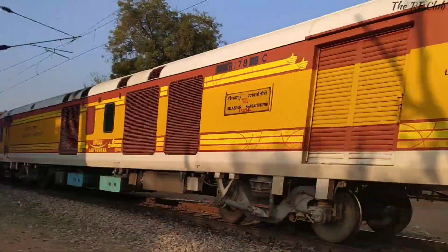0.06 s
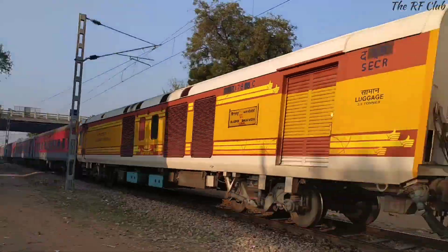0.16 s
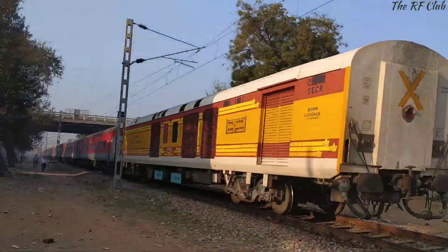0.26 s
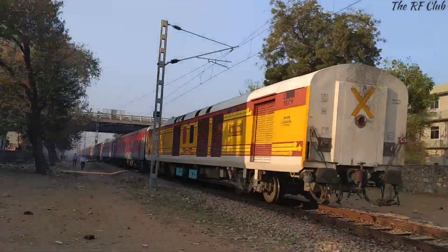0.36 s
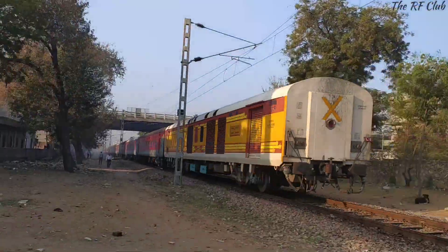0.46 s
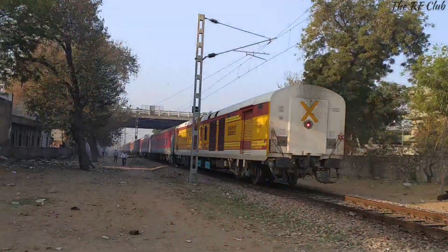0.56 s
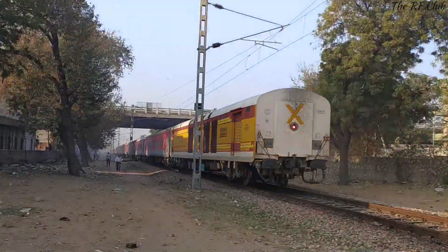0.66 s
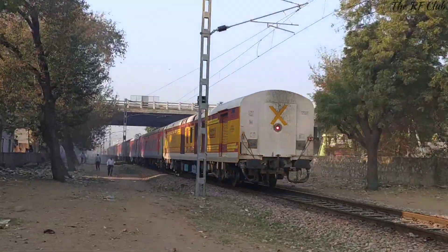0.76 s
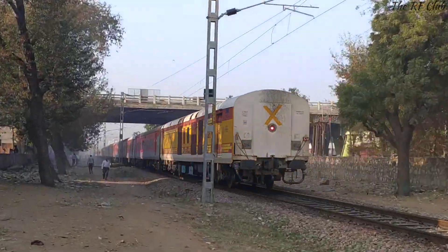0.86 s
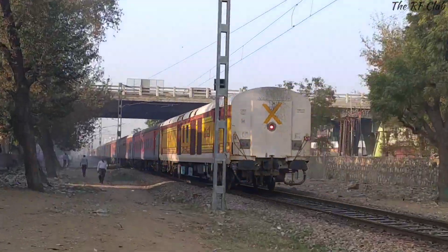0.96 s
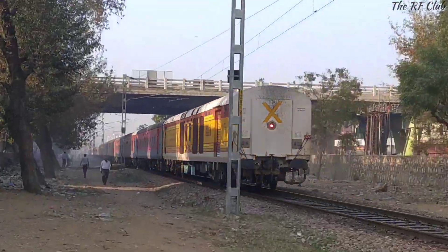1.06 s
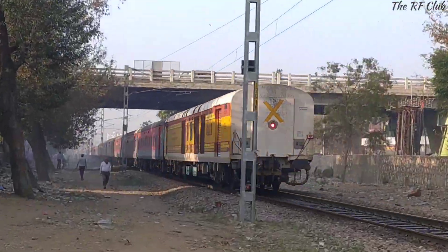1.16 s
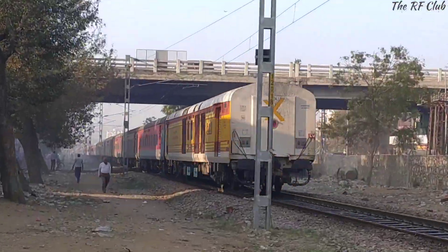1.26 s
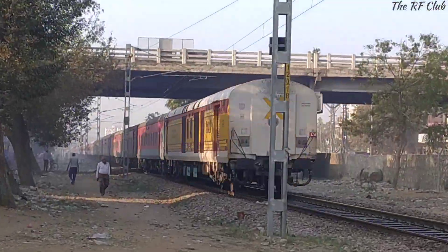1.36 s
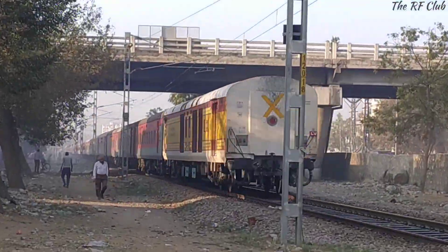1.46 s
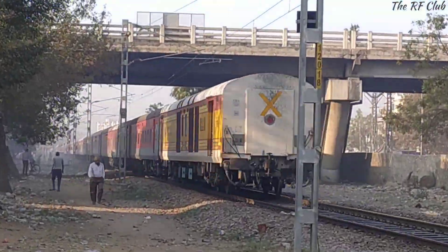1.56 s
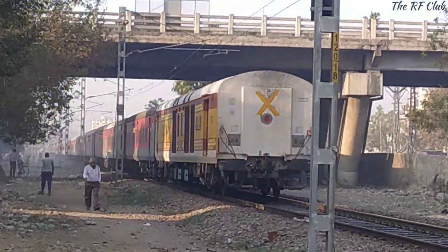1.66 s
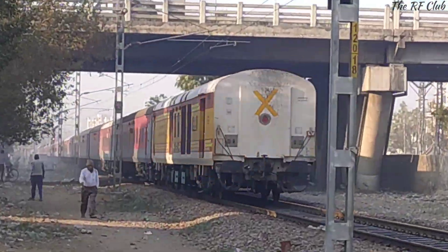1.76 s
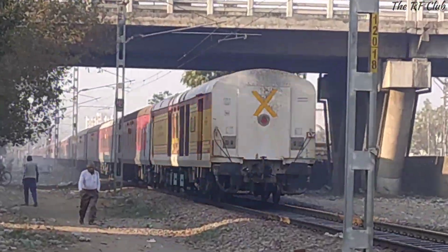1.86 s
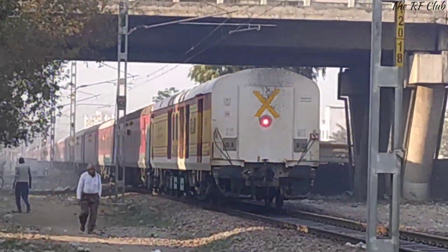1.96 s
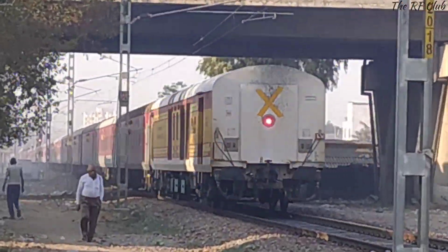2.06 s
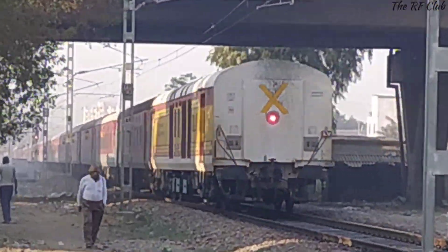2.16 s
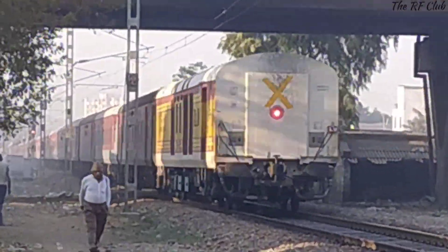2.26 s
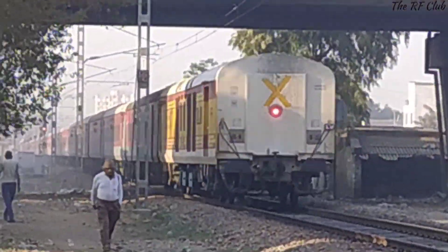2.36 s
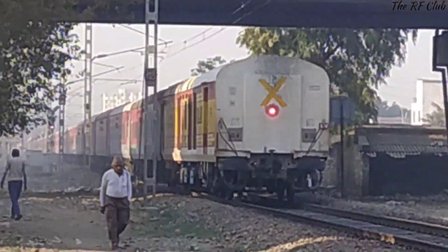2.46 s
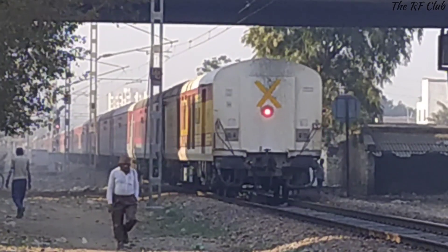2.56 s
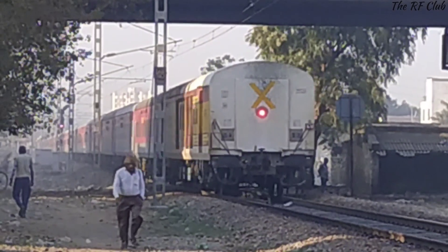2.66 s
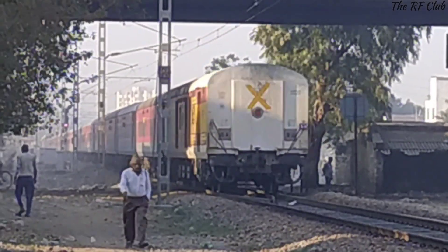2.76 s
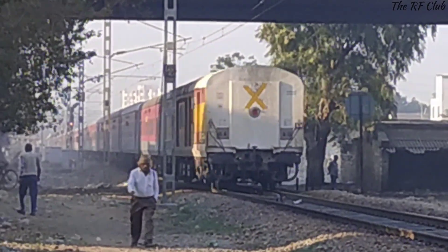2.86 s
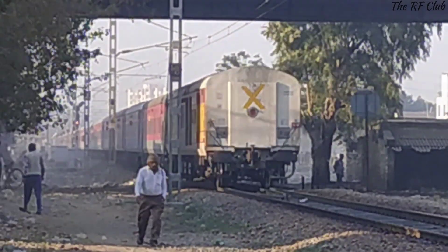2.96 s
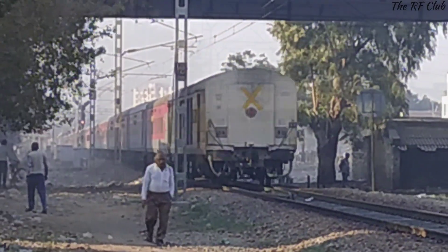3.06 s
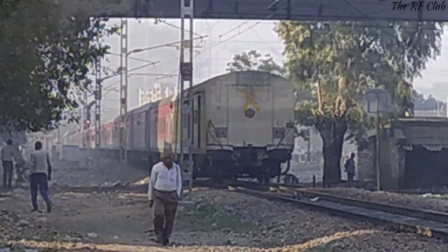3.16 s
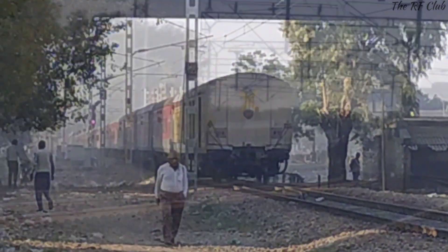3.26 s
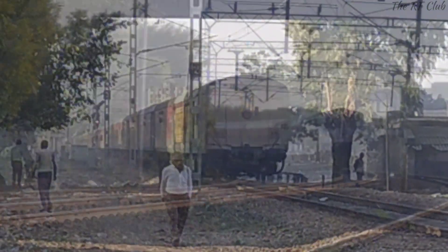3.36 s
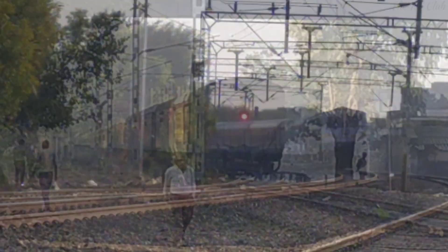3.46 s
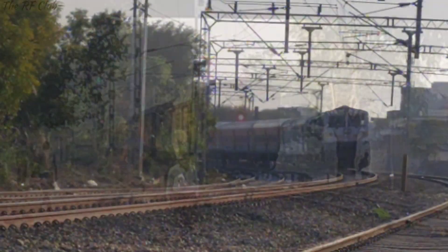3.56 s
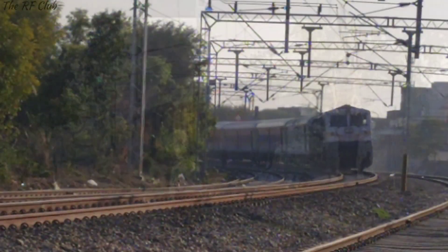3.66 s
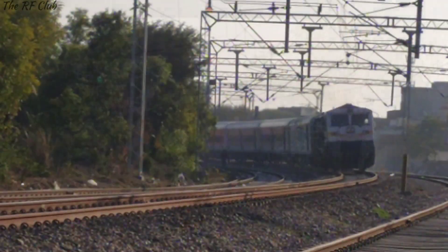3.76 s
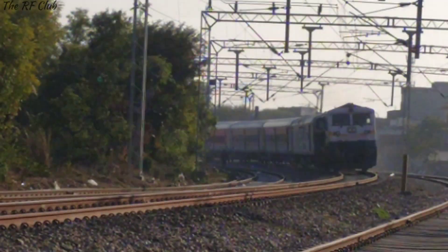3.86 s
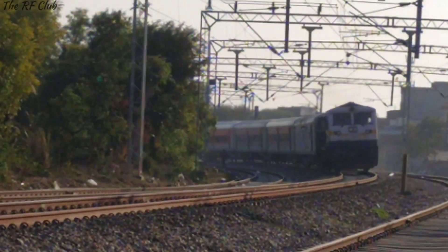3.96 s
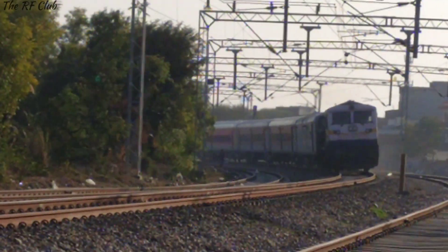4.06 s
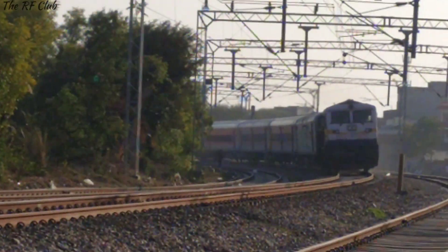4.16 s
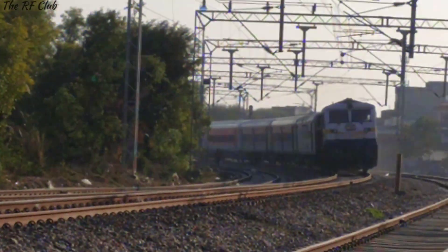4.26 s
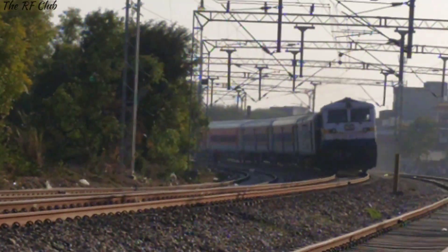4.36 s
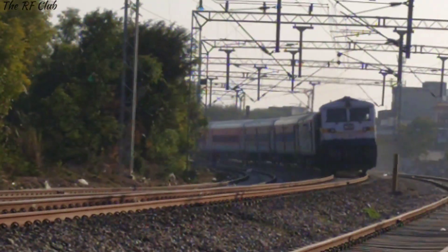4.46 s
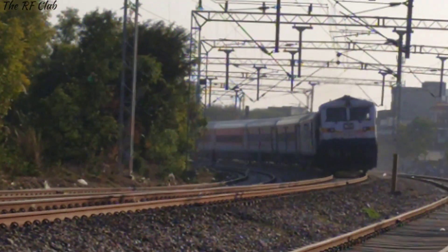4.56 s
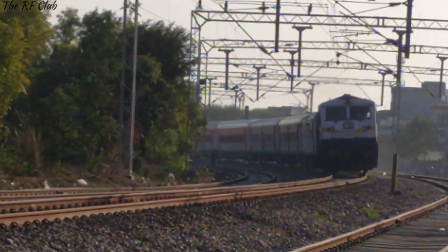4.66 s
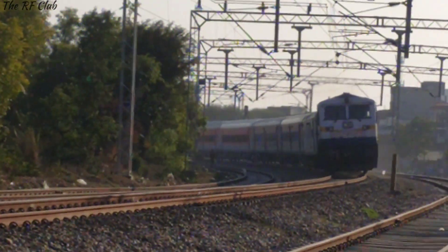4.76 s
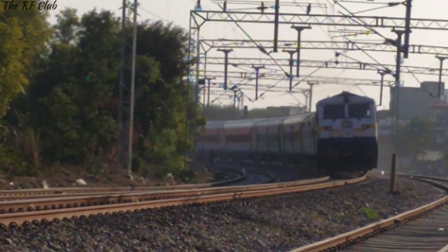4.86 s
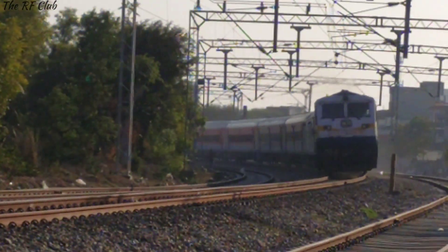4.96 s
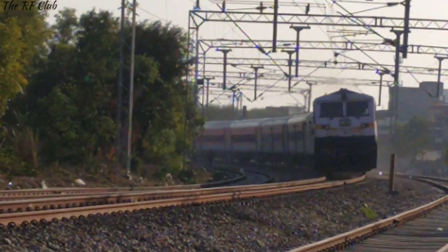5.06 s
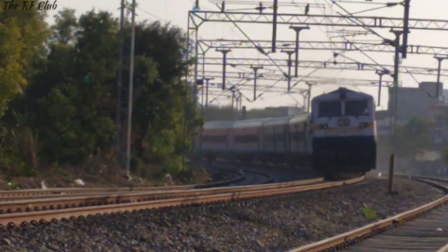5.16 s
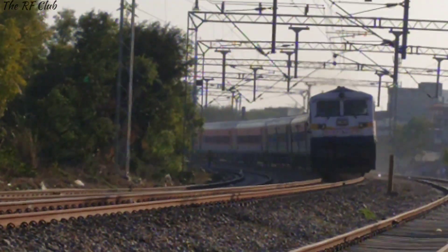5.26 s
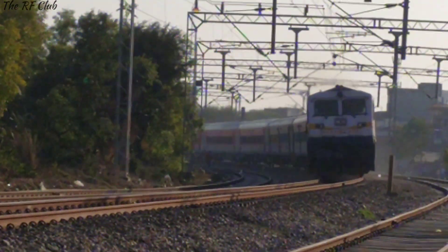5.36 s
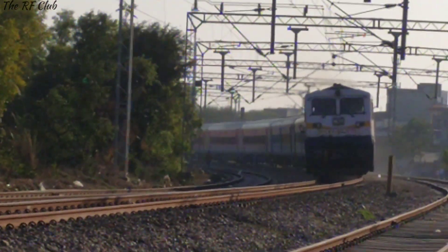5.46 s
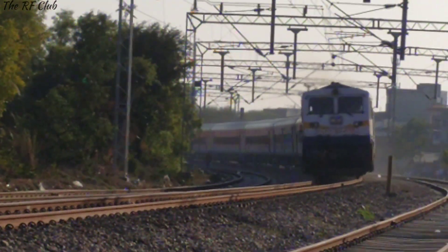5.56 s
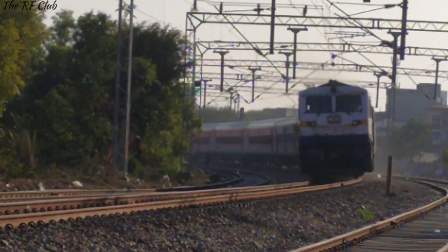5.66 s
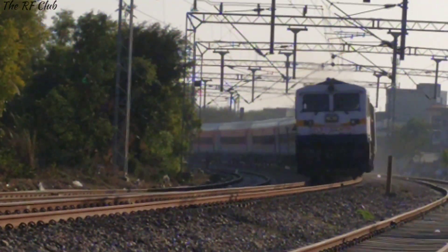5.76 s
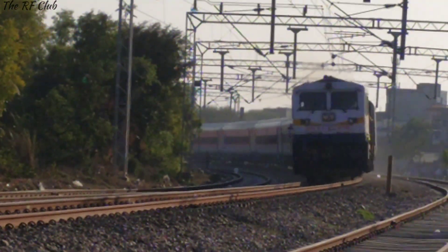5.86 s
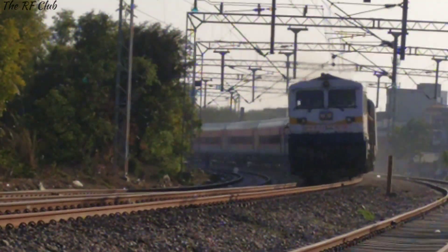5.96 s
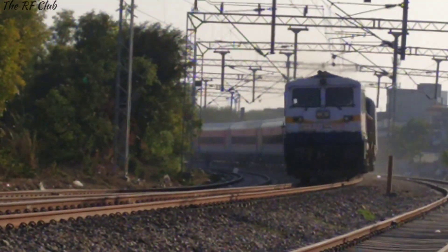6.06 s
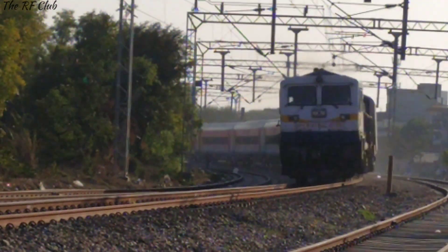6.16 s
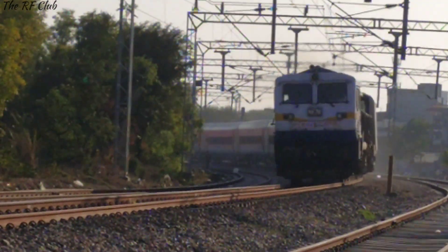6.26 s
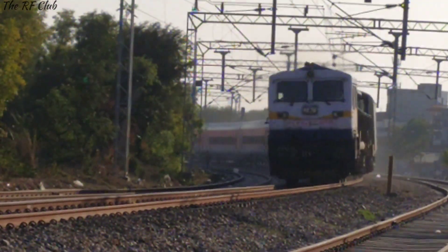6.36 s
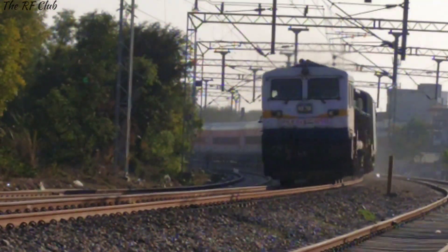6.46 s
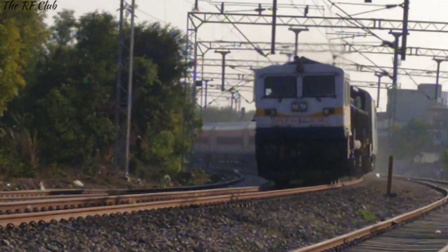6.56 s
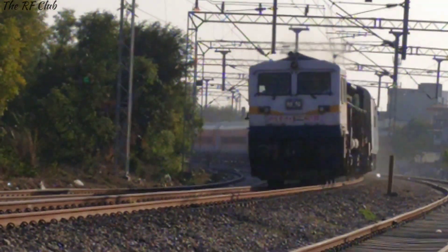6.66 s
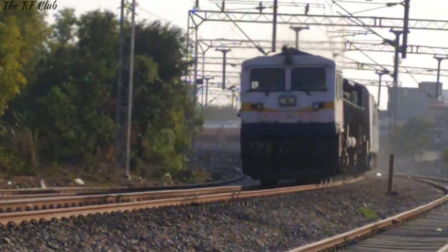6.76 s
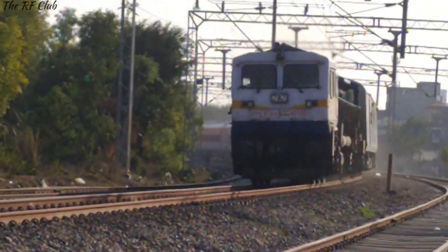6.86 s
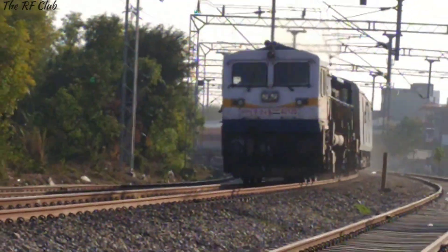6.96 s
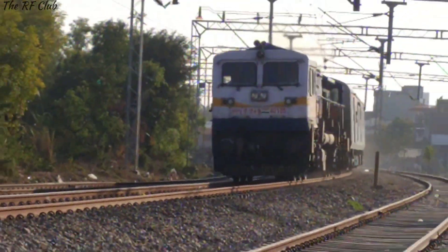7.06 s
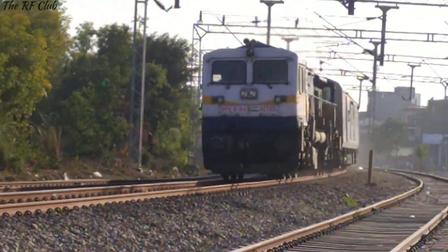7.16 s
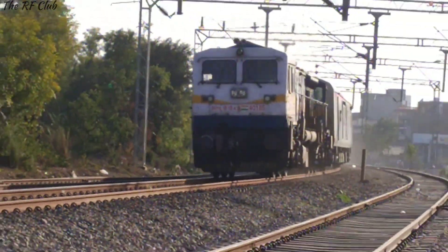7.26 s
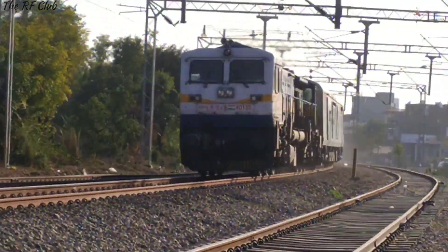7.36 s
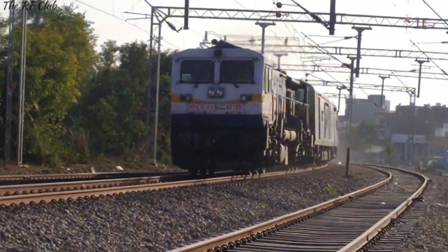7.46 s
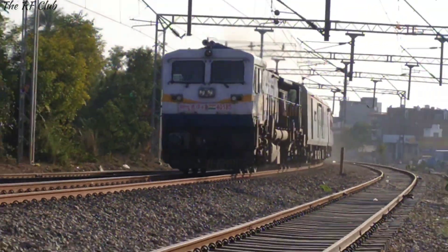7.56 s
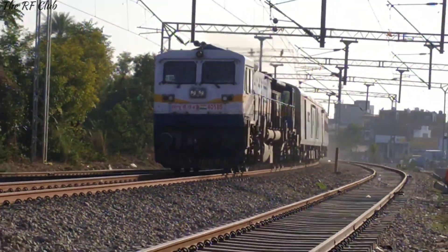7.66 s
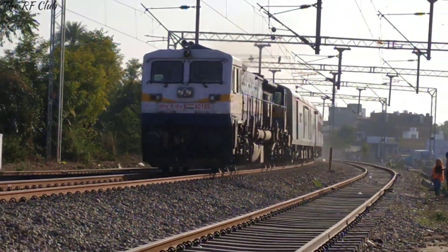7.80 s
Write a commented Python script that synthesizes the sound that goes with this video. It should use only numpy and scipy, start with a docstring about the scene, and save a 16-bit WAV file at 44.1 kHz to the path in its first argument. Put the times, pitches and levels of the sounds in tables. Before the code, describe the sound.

Train coaches clatter past over rail joints with brief squeals and fade away, then a quiet diesel drone grows until a loud brassy horn blares.

```python
"""Close to the track, the last coaches of a passenger train roll past over rail joints, with clatter, clacks
and short squeals, and fade down the line. The scene dissolves to a diesel locomotive coming round a curve:
the engine drones on multiples of the crank rate, filtered noise makes the rails sizzle, far knocks chirp.
Then one air horn, a sum of wavering partials, opens and holds a loud, brassy note; patchy high band noise is
added while it sounds. The left microphone is much duller than the right."""
import sys
import numpy as np
from scipy import signal
from scipy.fft import rfft, irfft, next_fast_len
from scipy.io import wavfile

SR = 44100
rng = np.random.default_rng(int(sys.argv[2]) if len(sys.argv) > 2 else 0)


def unload_wav(signal):
    """Save mono or channel-first audio to the path in sys.argv[1] as 16-bit WAV at rate SR, clipped to [-1, 1]."""
    wavfile.write(
        sys.argv[1],
        SR,
        np.round(np.clip(np.atleast_2d(signal).T, -1, 1) * 32767).astype(np.int16),
    )


N = 345303
TIME = np.arange(N) / SR
BINS = np.maximum(np.fft.rfftfreq(next_fast_len(N, True), 1 / SR), 1)  # Hz

# the last bogie is abreast at ABREAST_S, then runs away along a track TRACK_M from the microphones
ABREAST_S, SPEED_M_PER_S, TRACK_M = 0.12, 21.2, 4.64
# air valve of the horn: (time [s], share of full pressure [0..1])
VALVE = [(6.184, 0), (6.195, .18), (6.206, .36), (6.21, .78), (6.217, .84), (6.226, 1)]


def from_db(db):
    """Decibels to gain."""
    return np.exp(np.asarray(db) * (np.log(10) / 20))


def rms_one(x):
    """Scale to unit rms."""
    return x / np.sqrt(np.mean(x ** 2) + 1e-20)


def in_time(rows):
    """Each column of a curve, sample by sample."""
    s, *columns = np.transpose(rows)
    return [np.interp(TIME, s, c) for c in columns]


def at_hz(points, hz):
    """Read a spectrum on a log-frequency axis."""
    f, value = np.transpose(points)
    return np.interp(np.log(hz), np.log(f), value)


def ramp(start_s, end_s, before, after):
    """Hold, move evenly to a new value, hold."""
    return np.interp(TIME, [start_s, end_s], [before, after])


def bump(x, centre, half_width):
    """A smooth bell shape around one value, top 1."""
    return np.exp(-((x - centre) / half_width) ** 2)


def bell(s, half_s):
    """A smooth rise and fall around one moment, top 1."""
    return bump(TIME, s, half_s)


def swells(events):
    """Sum of bell-shaped swells, as a gain."""
    return sum(from_db(db) * bell(s, half_s) for s, half_s, db in events)


def panned(left_db):
    """Gains of the two ears for a level difference (left minus right), at constant power."""
    gains = from_db(np.array([[.5], [-.5]]) * left_db)
    return gains / np.sqrt(np.mean(gains ** 2, axis=0))


def drift(rate_hz, size=N):
    """Slow chance with spread 1, computed at every 40th sample and joined by straight lines."""
    step = 40
    r = np.exp(-2 * np.pi * step * rate_hz / SR)
    chance = rng.standard_normal(size // step + 2002)
    slow = signal.lfilter([1], [1, -2 * r, r * r], chance)[2000:]  # drop the settling of the filter
    return np.interp(np.arange(size) / step, np.arange(len(slow)), rms_one(slow))


def white():
    """Spectra of two unrelated white noises."""
    return rng.standard_normal((2, len(BINS))) + 1j * rng.standard_normal((2, len(BINS)))


def noise(colour):
    """Coloured noise, unrelated in the two ears; rms 1."""
    return rms_one(irfft(white() * from_db(at_hz(colour, BINS)))[:, :N])


def noise_zones(left, right, likeness, left_db, left_lag_s, edges_hz):
    """Stereo noise with a colour for each ear, cut into zones whose centre signal has rms 1."""
    mid, side = white()
    alike = np.clip(at_hz(likeness, BINS), -1, 1)
    both = np.sqrt(1 + alike) * mid + np.sqrt(1 - alike) * side * [[1], [-1]]
    both = both * from_db([at_hz(left, BINS) + left_db, at_hz(right, BINS)])
    both[0] *= np.exp(-2j * np.pi * BINS * left_lag_s)
    zone = np.searchsorted(edges_hz, BINS)
    parts = [irfft(both * (zone == k))[:, :N] for k in range(len(edges_hz) + 1)]
    return [p / np.sqrt(np.mean(p.mean(axis=0) ** 2)) for p in parts]


def ring(push, hz, t60):
    """Damped resonance: a unit click sets a sine of height 1 ringing, down 60 dB after t60 seconds."""
    r, w = from_db(-60 / (t60 * SR)), 2 * np.pi * hz / SR
    return signal.lfilter([0, np.sin(w)], [1, -2 * r * np.cos(w), r * r], push + 1e-18)


def rubbed(hz, width_hz):
    """Noise keeps a resonance of the given width ringing, apart in the two ears; rms 1."""
    return rms_one(ring(rng.standard_normal((2, N)), hz, np.log(1000) / (np.pi * width_hz)))


def struck(events, modes, scatter_db, spread_s):
    """Each blow reaches every mode with its own strength and a delay of up to spread_s."""
    s, peak_db = np.transpose(events)
    out = np.zeros(N)
    for hz, level_db, t60 in modes:
        clicks = np.zeros(N)
        at = ((s + spread_s * rng.random(len(s))) * SR).astype(int)
        clicks[at] = from_db(peak_db + level_db + scatter_db * rng.standard_normal(len(s)))
        out += ring(clicks, hz, t60)
    return out


def delayed(x, delay_s):
    """Both ears read through a changing delay, which bends the pitch."""
    return np.array([np.interp(TIME - delay_s, TIME, ear) for ear in x])


def track_distances():
    """Distance of the last bogie, in multiples of the distance to the track."""
    return np.hypot(1, SPEED_M_PER_S * np.maximum(TIME - ABREAST_S, 0) / TRACK_M)


def rolling_coaches(distance):
    """Rough wheels shake the bodies and roar on the rails; each layer loses its own dB per doubled distance."""
    # colour in each ear: (frequency [Hz], level [dB per Hz])
    left_colour = [(18, -37), (30, -4), (128, -2.5), (202, 5), (473, -12), (623, -6.5), (954, -5),
                   (1170, -17.5), (1700, -6.5), (1880, -32), (3020, -8.5), (5660, -37), (7450, -86),
                   (8030, -62), (12000, -55), (15600, -79), (22000, -120)]
    right_colour = [(18, -38), (30, -4), (128, -5), (188, -1), (572, -14), (935, -9.5), (1280, -13.5),
                    (1650, -10), (1880, -9.5), (2140, -9.5), (2500, -4.5), (3240, -17), (4890, -29.5),
                    (6340, -19), (8210, -17), (9590, -21), (10600, -36), (14500, -46)]
    # likeness of the two ears: (frequency [Hz], likeness [-1..1])
    likeness = [(60, 0.33), (180, 0.59), (550, 0.65), (1650, 0.43), (4970, 0.097), (15000, 0.01)]
    # bursts of clatter from the running gear: (time [s], half length [s], level [dB])
    clatter_bursts = [(0.06, 0.026, -23), (0.22, 0.01, -19.5), (0.305, 0.02, -30), (0.395, 0.017, -26),
                      (0.81, 0.21, -31), (1.04, 0.053, -32), (2.86, 0.038, -41)]
    # (level abreast dB, loss per doubling of distance dB) of rumble, roar, rail ring and wheel hiss
    layers = (-20.5, 2.1), (-20.5, 3.11), (-20.5, 3.42), (-28, 4.88)
    doublings = np.log2(distance)
    rumble_db, roar_db, ring_db, hiss_db = [db - loss_db * doublings for db, loss_db in layers]
    rumble, roar, rails, hiss = noise_zones(left_colour, right_colour, likeness, left_db=1.0,
                                            left_lag_s=.00007, edges_hz=[400, 1600, 5500])
    judder = drift(34)  # loose gear shakes all layers together
    clatter = swells(clatter_bursts)
    ring_gain = from_db(ring_db + 0.42 * judder + 0.5 * drift(27))
    out = rumble * from_db(rumble_db + drift(3.5) + 0.87 * judder)
    out += roar * np.hypot(from_db(roar_db + 0.89 * judder), clatter)
    out += rails * np.hypot(ring_gain, from_db(0.5) * clatter)
    out += hiss * from_db(hiss_db + 0.26 * judder + drift(30))
    return out


def ringing_wheels(distance):
    """Wheel modes kept ringing by noise; swaying bends them slightly in pitch, and they carry farther."""
    # (frequency [Hz], width [Hz], relative level [dB])
    wheel_modes = [(918, 69, -10.5), (2140, 42, -5.5), (2387, 99, -9), (2676, 68, -18)]
    abreast_db, loss_db, wander_s = -20, 1.9, 0.000501  # loss per doubling of distance
    out = np.zeros((2, N))
    for hz, width_hz, mode_db in wheel_modes:
        swaying = delayed(rubbed(hz, width_hz), wander_s * drift(3.02))
        level_db = abreast_db - loss_db * np.log2(distance) + mode_db + 1.5 * drift(3)
        out += swaying * panned(-2.5) * from_db(level_db)
    return out


def joint_knocks():
    """Wheels strike the rail joints and set the modes of the bogie ringing."""
    # wheels on rail joints: (time [s], relative peak level [dB])
    joints = [(0.052, -4), (0.222, -11), (0.289, -4), (0.356, -17), (0.405, -7), (0.48, -8), (0.55, -4),
              (0.658, -6.5), (0.705, -5.5), (0.813, -6), (0.905, -5), (0.977, -16), (1.03, -3), (1.118, -9),
              (1.232, -7.5), (1.325, -5.5), (1.419, -10), (1.504, -7), (1.647, -7), (1.689, -16),
              (1.77, -9), (1.87, -14), (1.9, -11), (1.975, -13), (2.03, -15), (2.095, -7.5), (2.215, -14),
              (2.25, -13), (2.335, -10), (2.44, -14), (2.83, -12), (2.97, -10.5), (3.04, -13),
              (3.42, -12.5)]
    # what a bogie rings with: (frequency [Hz], relative level [dB], t60 [s])
    bogie_modes = [(103.3, -11, 0.28), (161.8, -7, 0.27), (198, -3.5, 0.28), (243.6, -0.5, 0.099),
                   (351, -3, 0.1), (610, -12, 0.1), (850, -26, .12), (1730, -30, 0.081), (2346, -9.5, 0.15)]
    knocks = from_db(-11.0) * struck(joints, bogie_modes, scatter_db=1.5, spread_s=0.00519)
    return signal.sosfilt(signal.butter(2, 55, "high", fs=SR, output="sos"), knocks)


def gear_clacks():
    """Loose gear clacks against the frame, which answers with short damped modes."""
    # (time [s], relative peak level [dB])
    clacks = [(0.041, -17), (0.259, -13.5), (0.378, -15.5), (0.523, -15.5), (0.753, -15), (0.838, -20),
              (1.077, -15)]
    # what it rings with: (frequency [Hz], relative level [dB], t60 [s])
    clack_modes = [(525, -4, 0.059), (690, -2, 0.043), (850, -4, .06), (957, -4, 0.09), (1570, -12, 0.036),
                   (2130, -5, 0.065), (2465, 0.5, 0.059)]
    return from_db(-2.5) * struck(clacks, clack_modes, scatter_db=4.0, spread_s=0.00402)


def wheel_scrape():
    """A short bright scrape of the nearest wheel: a swell of coloured noise, almost all on the right."""
    # (frequency [Hz], level [dB per Hz])
    scrape_colour = [(2000, -11), (4000, 1), (8000, 13), (12000, -4), (15000, -7)]
    return noise(scrape_colour) * panned(-22.0) * swells([(0.07, 0.04, -20.5)])  # s, half length s, dB


def low_surges():
    """Heavy low surges of the rumble: swells of dark noise, stronger on the right."""
    # (frequency [Hz], level [dB per Hz])
    surge_colour = [(50, -23), (110, -8), (200, -4), (360, -10), (600, -14), (1500, -68)]
    # (time [s], half length [s], level [dB])
    surges = [(0.93, .03, -23), (1.43, 0.052, -24), (1.64, 0.034, -28), (2.24, 0.048, -30),
              (2.85, 0.083, -23)]
    return noise(surge_colour) * panned(-12) * swells(surges)


def coaches():
    """Rolling, knocks, clacks, scrape and surges of the leaving coaches; squeals are added apart."""
    distance = track_distances()
    abreast_db, far_db = -1.5, -10.5  # left minus right
    pan = panned(far_db + (abreast_db - far_db) / distance)
    rolling = rolling_coaches(distance) + ringing_wheels(distance)
    return (rolling + joint_knocks() + gear_clacks()) * pan + wheel_scrape() + low_surges()


def squeals():
    """A flange rubs the rail and makes one wheel mode sing for a moment, sinking in pitch as the wheel goes by."""
    # brief squeals of the nearest wheels: (time [s], half length [s], frequency at rest [Hz], relative level [dB])
    squeal_events = [(0.25, 0.03, 980, -23), (0.22, 0.04, 1740, -20), (0.3, 0.034, 1870, -26),
                     (0.21, 0.04, 2600, -22), (0.295, 0.04, 2545, -17.5), (0.22, 0.04, 3170, -25),
                     (0.305, 0.06, 3105, -22), (0.22, 0.08, 3600, -28)]
    travel_s = TRACK_M * (track_distances() - 1) / 343  # the growing sound path gives the Doppler shift
    out = np.zeros((2, N))
    for s, half_s, hz, db in squeal_events:
        out += delayed(rubbed(hz, width_hz=28.0), travel_s) * swells([(s, half_s, db)])
    return from_db(-1.0) * out * panned(-2.6)


def exhaust_drone():
    """Exhaust pulses as sines on multiples of an unsteady crank rate; rms 1."""
    # (multiple of the crank rate [1], relative level [dB])
    engine_orders = [(4, -8), (5, 6.5), (6, 3.5), (8, 12), (9, 13), (10, 5.5)]
    crank_hz = 17.2
    turn = 2 * np.pi * np.cumsum(crank_hz * (1 + 0.00621 * drift(1.58))) / SR
    drone = np.zeros(N)
    for order, level_db in engine_orders:
        gain = from_db(level_db + 2 * drift(3.2))
        angle = round(order) * turn + rng.uniform(0, 2 * np.pi) + 0.092 * drift(7.3)
        drone += gain * np.sin(angle)
    return rms_one(drone)


def rail_knocks():
    """High bending waves outrun low ones in the rail, so each far knock arrives as a quick falling chirp."""
    # far wheels strike a joint: (time [s], relative peak level [dB])
    far_knocks = [(3.716, -40.5), (3.842, -37), (4.665, -36), (5.158, -37), (5.3, -28.5), (5.425, -30.5),
                  (5.548, -36.5)]
    # what the rail rings with: (frequency [Hz], relative level [dB], t60 [s])
    far_modes = [(385, 1, .11), (441, -8, 1.0), (620, -4, .06), (880, -1, .07), (1150, -4.5, .11),
                 (1280, -14, .4)]
    # a partial two octaves below reference_hz arrives spread_s later
    reference_hz, spread_s = 1150, .07
    knocks = struck(far_knocks, far_modes, scatter_db=1.0, spread_s=0.002)
    cycles_late = spread_s * (2 * np.sqrt(reference_hz * BINS) - BINS)
    return irfft(rfft(knocks, next_fast_len(N, True)) * np.exp(-2j * np.pi * cycles_late))[:N]


def locomotive():
    """Exhaust drone, far rolling noise and sizzling rails; all grow, then dip under the horn."""
    # colour in each ear: (frequency [Hz], level [dB per Hz])
    left_colour = [(18, -48), (30, -7), (81, -3), (107, -19), (143, 3.5), (304, -15), (426, -14),
                   (472, -22.5), (612, -13.5), (1240, -9.5), (1560, -23.5), (3230, -28), (5030, -48.5),
                   (11600, -39.5), (13500, -39), (15000, -81)]
    right_colour = [(18, -49), (30, -1.5), (53, -9), (81, -5), (107, -16), (143, -1), (247, -13),
                    (281, -11.5), (312, -19.5), (426, -15), (472, -25), (645, -14), (881, -10), (1600, -17),
                    (2430, -12), (4900, -40), (7060, -12), (8250, -26), (15000, -24)]
    # likeness of the two ears: (frequency [Hz], likeness [-1..1])
    likeness = [(60, 0.68), (150, 0.93), (380, 1), (950, 0.62), (2400, 0), (6000, 1)]
    # the rails sizzle up ahead of the train: (time [s], half length [s], level [dB])
    sizzle_flares = [(4.03, 0.16, -53), (4.57, 0.073, -58), (4.76, 0.042, -47), (5.04, 0.043, -47),
                     (5.26, .035, -51), (5.5, 0.13, -59), (5.86, 0.16, -48)]
    closing_s = (4.1, 5.57)  # the locomotive draws nearer over this span
    # (far dB, near dB, dip under the horn dB) of engine, far rolling, sizzle and top hiss
    layers = (-37, -31, -3), (-38, -35.5, -1), (-52, -45, -1), (-49, -44.5, -7)
    (pressure,), flares = in_time(VALVE), swells(sizzle_flares)
    engine_db, rolling_db, sizzle_db, hiss_db = [
        ramp(*closing_s, far_db, near_db) + dip_db * pressure for far_db, near_db, dip_db in layers]
    exhaust, rolling, sizzle, hiss = noise_zones(left_colour, right_colour, likeness, left_db=-4.0,
                                                 left_lag_s=0.00043, edges_hz=[260, 5000, 9000])
    out = from_db(engine_db) * (from_db(-3.0) * exhaust_drone() + from_db(-5.5) * exhaust)
    out += rolling * from_db(rolling_db + drift(19))
    lull_db = -2.5 * bell(6.15, 0.083)  # the sizzle dips just ahead of the horn
    out += sizzle * (from_db(sizzle_db) + flares) * from_db(lull_db + 1.2 * drift(7.8))
    # only part of each flare reaches the top hiss
    out += hiss * (from_db(hiss_db) + 0.18 * flares) * from_db(0.9 * drift(14))
    return out + rail_knocks()


def pulse_phases(level_db):
    """Phases of the partials of one causal pressure pulse per cycle (minimum phase)."""
    nepers = np.log(from_db(np.r_[level_db.min(), level_db]))
    return -signal.hilbert(np.r_[nepers, nepers[-2:0:-1]]).imag[1:len(nepers)]


def horn(count=49, flutter_db=0.7, shimmer_db=2.0, wander_rad=0.42):
    """A diaphragm chops the air into sharp pulses; moving air and scattered echoes make the partials waver and fade."""
    # the horn starts sharp and settles: (time [s], pitch [Hz])
    horn_pitch = [(6.18, 328), (6.205, 330), (6.222, 323), (6.26, 320.2), (6.31, 318.6), (6.38, 318.05),
                  (7.83, 318.1)]
    # relative levels: (number [1], far left [dB], far right [dB], near left [dB], near right [dB])
    horn_partials = [(1.0, -24, -24.5, -25.5, -31.5), (2.0, -17.5, -18.5, -14, -13.5),
                     (3.0, -15.5, -23, -15, -19), (4.0, -21, -27.5, -27.5, -26),
                     (5.0, -21, -32, -29, -25.5), (6.0, -23.5, -24, -31, -21.5),
                     (7.0, -27.5, -24, -32, -22), (8.0, -34, -16, -33, -15), (9.0, -17.5, -21, -23, -22.5),
                     (10.0, -24.5, -26, -18, -23.5), (11.0, -29, -27.5, -21, -30),
                     (12.0, -37, -31.5, -30.5, -33), (13.0, -39, -35.5, -36.5, -32.5),
                     (14.0, -50, -37, -45, -37.5), (16.0, -58, -46, -36, -39.5),
                     (19.0, -66, -32.5, -40, -32), (22.0, -67.5, -31.5, -44.5, -38),
                     (25.0, -77.0, -31, -63, -30), (27.0, -69, -49, -45, -29.5),
                     (29.0, -80.0, -43, -45, -45.5), (35.0, -73, -45.5, -68, -45.5),
                     (41.0, -89, -48, -61, -44.5), (48.0, -96, -51, -94, -54)]
    # phase by which the right port leads the left: (frequency [Hz], phase [rad])
    port_lag = [(318, 0.5), (636, 1.17), (954, 0.9), (1900, 2.5), (2550, 1.6), (2860, -1.5), (3500, 3),
                (3900, 4.5)]
    # change of colour as the mouth swings past the listener: (frequency [Hz], left [dB], right [dB])
    beam_colour = [(318, 3, 3), (636, 0, 2), (954, 0.5, 2), (1272, -1, -1.5), (1600, 5.5, 5),
                   (1910, 0, 2.5), (2250, -3.5, 1.5), (2680, -11, -2.5), (3850, -1, 5), (5300, 2, 8),
                   (6860, 10, -2)]
    # the ground echo cancels one band, which sinks as the horn nears: (time [s], left [Hz], right [Hz])
    ground_notch = [(6.2, 4200, 3650), (6.55, 3530, 3400), (6.66, 3330, 3220), (7.0, 2960, 3040),
                    (7.25, 2840, 2830), (7.45, 2620, 2280), (7.83, 2420, 2250)]
    notch_db, notch_width_hz = (11, 7), 220  # depth left and right
    blat_db, blat_hz, blat_width_hz = 14, 1870, 530
    sag_db, sag_hz, sag_width_hz = -18, 1900, 120
    # echoes off masts and trees: their level, and the least they stay below the partial
    scatter_db, scatter_below_db = -39, 11

    (pitch_hz,), (pressure,) = in_time(horn_pitch), in_time(VALVE)
    on = TIME > VALVE[0][0]
    # rounding the curve, the horn turns from its far towards its near colour
    near_left = ramp(6.6, 6.78, 0, 0.68)[on]
    near_left_treble = ramp(6.85, 7.4, 0, 1)[on]
    near_right = ramp(6.49, 6.8, 0, 0.84)[on]
    blat = bell(6.203, 0.015)[on]  # the diaphragm blats in the middle range as it breaks loose
    sag = bell(7.48, 0.14)[on]  # the middle of the blare thins out for a moment at close range
    facing = bell(6.904, 0.32)[on]  # on the curve the mouth swings past the listener
    notch_hz = [hz[on] for hz in in_time(ground_notch)]
    pressure = pressure[on]
    cycles = np.cumsum(pitch_hz * (1 + 0.00096 * drift(29)))[on] / SR

    numbers, (listed, *columns) = np.arange(1, count + 1), np.transpose(horn_partials)
    partial_hz = numbers * pitch_hz[-1]
    levels = np.array([np.interp(numbers, np.round(listed), c) for c in columns])
    # the bright edge of each pulse arrives just ahead of its round body
    edge_lead = 2 * np.pi * .15 * np.maximum(numbers - 11, 0)
    left_phases = pulse_phases(np.maximum(levels[0], levels[2])) + edge_lead
    phases = [left_phases, left_phases + at_hz(port_lag, partial_hz)]
    flutter = flutter_db * drift(100)[on]
    tone = np.zeros((2, N))
    for ear, (near_low, near_high) in enumerate([(near_left, near_left_treble), (near_right, near_right)]):
        beam_db = at_hz(np.array(beam_colour)[:, [0, ear + 1]], partial_hz)
        partials = zip(numbers, partial_hz, levels[ear], levels[ear + 2], phases[ear])
        for k, hz, far_db, near_db, phase in partials:
            near = near_low if k <= 13 else near_high
            level_db = far_db + near * (near_db - far_db) + facing * beam_db[k - 1]
            scatter = from_db(np.minimum(scatter_db, level_db - scatter_below_db))
            level_db += blat_db * blat * bump(hz, blat_hz, blat_width_hz)
            level_db -= notch_db[ear] * bump(hz, notch_hz[ear], notch_width_hz)
            level_db += sag_db * sag * bump(hz, sag_hz, sag_width_hz)
            height = min(k / 10, 1)  # short waves waver most
            slow, fast = [drift(rate, size=2 * len(near)).reshape(2, -1) for rate in (2, 13)]
            level_db += flutter + height * shimmer_db * slow[0]
            angle = 2 * np.pi * k * cycles + phase + height * wander_rad * slow[1]
            # the echoes beat against the partial, in step and a quarter cycle off
            wave = (np.sqrt(2) * from_db(level_db) + scatter * fast[0]) * np.cos(angle)
            wave += scatter * fast[1] * np.sin(angle)
            # upper partials need more pressure, so the attack opens from dull to bright
            tone[ear, on] += wave * pressure ** (1 + (k / 11) ** 2)
    return from_db(0.24) * tone


def patchy_treble():
    """Band noise between about 4 and 9 kHz, each band with its own random level, with short louder patches."""
    # (frequency [Hz], level [dB per Hz])
    patch_colour = [(2000, -45), (3300, -22), (4500, -4), (5400, -8), (6300, 0), (8600, 0), (9200, -26),
                    (15000, -40)]
    # short louder patches: (time [s], half length [s], level [dB])
    noise_patches = [(6.485, 0.022, -40), (6.62, 0.022, -26.5), (7.19, 0.022, -28), (7.28, 0.039, -27),
                     (7.585, 0.022, -34), (7.66, 0.022, -33)]
    steady_db, patchy_db = -46, 6.5
    (pressure,), patches = in_time(VALVE), swells(noise_patches)
    spectrum = white()[0] * from_db(at_hz(patch_colour, BINS))
    zone = np.searchsorted([4700, 5700, 6600, 7600], BINS)
    bands = [irfft(spectrum * (zone == k))[:N] for k in range(zone.max() + 1)]
    treble = np.zeros(N)
    for band in bands:
        band_gain = from_db(steady_db + patchy_db * np.minimum(drift(11), 2))
        treble += band * (band_gain + patches * from_db(2 * drift(11)))
    # heard only while the horn sounds, mostly on the right
    return treble / np.std(sum(bands)) * panned(-15.0) * pressure ** 2


def scene():
    """The leaving coaches dissolve into the approaching locomotive, which then sounds its horn."""
    change = ramp(2.74, 4.08, 0, 0.95)  # a trace of the coaches stays
    leaving = (1 - change) ** 1.12 * coaches() + squeals()
    approaching = change ** 0.88 * locomotive()
    return leaving + approaching + horn() + patchy_treble()


def record(dry):
    """The highest peaks are rounded and the top is cut."""
    limited = dry / (1 + dry ** 8) ** (1 / 8)
    cutoff_hz = 15800
    return signal.sosfilt(signal.ellip(10, .1, 90, cutoff_hz, fs=SR, output="sos"), limited)


dry = scene()
out = record(dry)
unload_wav(out)
```